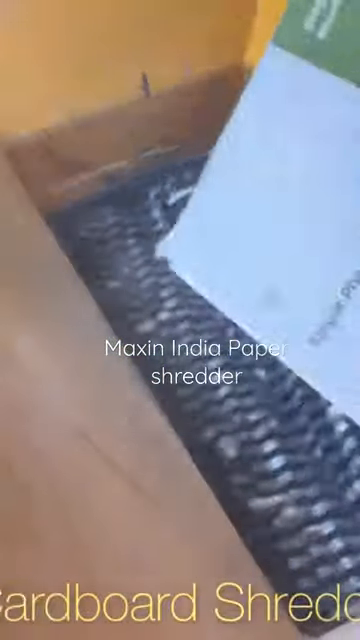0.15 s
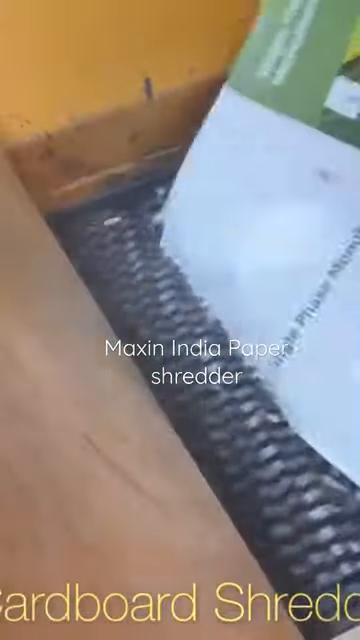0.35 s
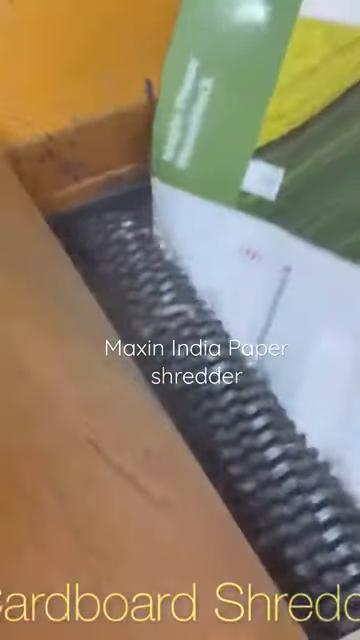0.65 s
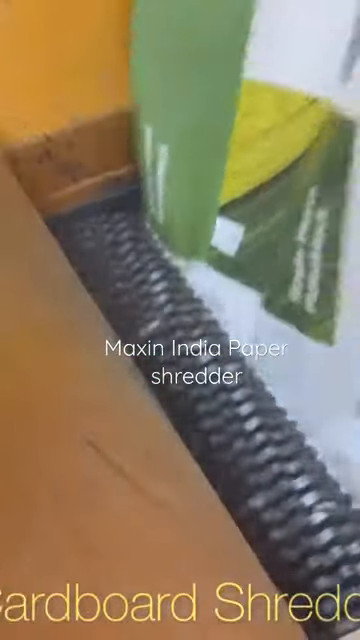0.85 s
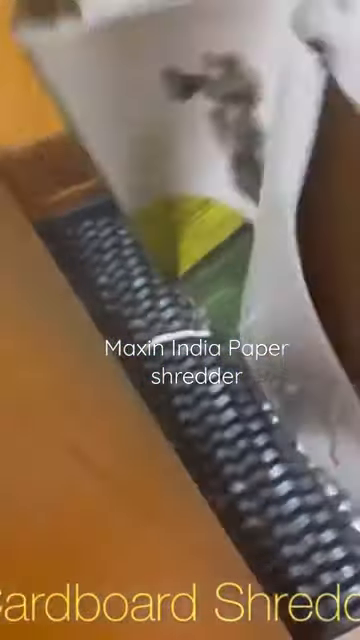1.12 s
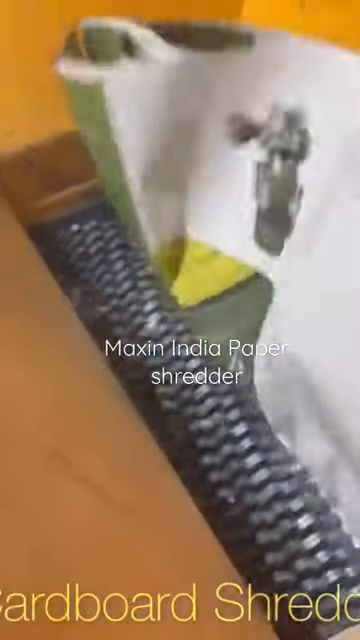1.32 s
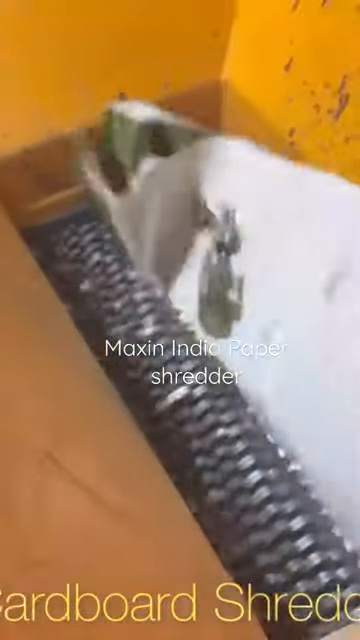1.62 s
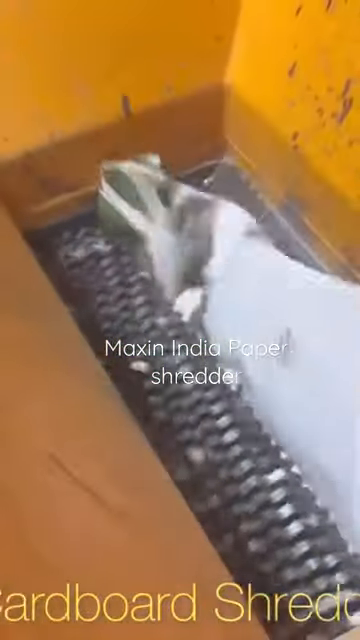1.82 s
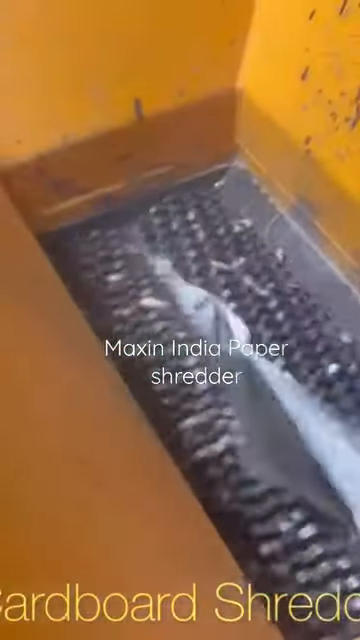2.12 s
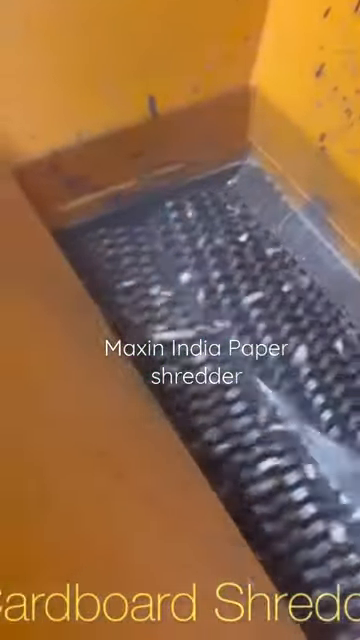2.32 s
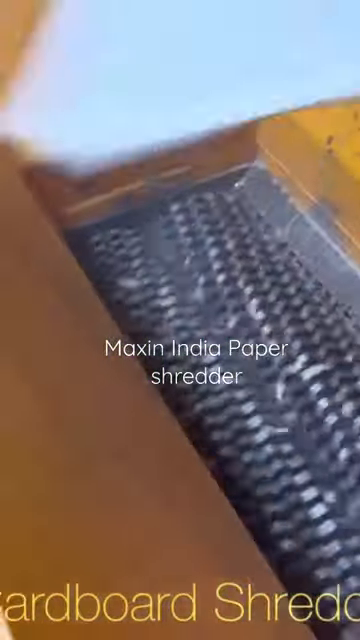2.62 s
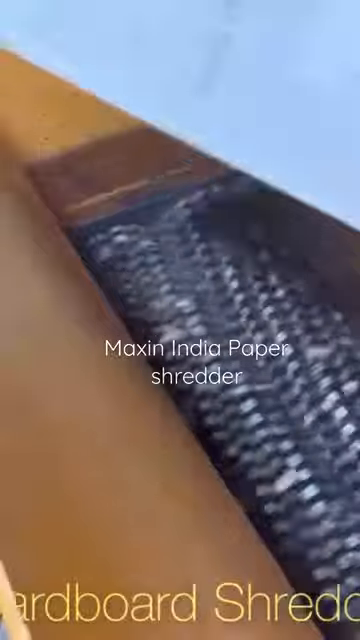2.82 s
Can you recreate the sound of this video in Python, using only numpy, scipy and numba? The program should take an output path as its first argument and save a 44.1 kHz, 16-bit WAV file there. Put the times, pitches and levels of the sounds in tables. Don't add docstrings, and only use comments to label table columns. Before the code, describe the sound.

Close by a metal hopper, shredder rollers bite into cardboard, crackling and tearing hard over low pulsing hum and thin motor whine; the crunch dies away, leaving rumble, a small knock and a thin squeak.

```python
import sys
import numpy as np
from scipy import signal
from scipy.fft import rfft, irfft
from scipy.io import wavfile
from scipy.ndimage import uniform_filter1d
from numba import njit

SR = 44100
rng = np.random.default_rng(int(sys.argv[2]) if len(sys.argv) > 2 else 0)


def invert_db(level):
    return 10 ** (np.asarray(level, dtype=float) / 20)


def bounce(signal):
    frames = np.transpose(np.atleast_2d(signal))
    limited = np.clip(frames, -1, 1)
    pcm = np.round(limited * 32767).astype(np.int16)
    wavfile.write(sys.argv[1], SR, pcm)


N = 130095

# frequency in Hz, density in dB per Hz.
IDLE_SPECTRUM = [(140, 1), (450, -1), (650, -10), (1500, -20.5), (3200, -29.5), (5200, -25), (8000, -33),
                 (15000, -60.5)]
# frequency in Hz, density in dB per Hz.
SUB_SPECTRUM = [(20, -20), (50, -22), (85, 12)]
WHINE_HZ = [3871, 4236, 4700, 4820, 4941, 5060, 5180, 5301, 5768, 5889, 6122, 1098]
# level at the start in dB, level at the end in dB.
WHINE_LEVELS = [(-68, -57), (-66, -63), (-68, -65), (-52, -72), (-57, -54), (-63, -56), (-63, -52),
                (-67, -61), (-65, -60), (-72, -62), (-68, -60), (-52.5, -58)]
# time in seconds, pitch in Hz, level in dB.
SQUEAK_PATH = [
    (2.675, 8730, -66),
    (2.69, 9120, -57),
    (2.744, 9760, -63),
    (2.764, 10360, -58),
    (2.784, 10060, -61),
    (2.81, 9750, -77),
    (2.84, 8940, -50.5),
    (2.86, 9300, -65),
    (2.95, 9400, -60),
]
# start in seconds, peak in dB, pitch in Hz, dip before it in dB.
THROBS = [(0.0, -20, 97.6, -19), (0.085, -27.5, 98.5, -32), (0.202, -9, 102.4, -33),
          (0.352, -9.5, 105.3, -6.5), (0.411, -6.5, 106.1, -15.5), (0.501, -6, 100.7, -21),
          (0.643, 0, 102.6, -23), (0.728, -5.5, 104.8, -29), (0.797, -1.5, 102.3, -28),
          (0.881, -8.5, 94.6, -6), (0.941, -5.5, 104.5, -32), (0.995, -10, 100.1, -22),
          (1.048, -7, 100.7, -18), (1.133, -8, 99.7, -28), (1.218, -7.5, 99.6, -20),
          (1.298, -11.5, 98.2, -14), (1.384, -7.5, 109.7, -25.5), (1.49, -6, 106.3, -4),
          (1.58, -9, 100.9, -37), (1.692, -8.5, 105.1, -15), (1.753, -5, 107.5, -33),
          (1.821, -9, 100.7, -18.5), (1.892, -1, 103.4, -25), (1.977, -11.5, 103.2, -11),
          (2.042, -6.0, 103.5, -14.5), (2.115, -4, 108.2, -8.5), (2.197, -14, 107.6, -24),
          (2.328, -14, 108, -34), (2.388, -9.5, 106.7, -16.5), (2.463, -27, 106.9, -33),
          (2.539, -16.5, 108.4, -41), (2.609, -14.5, 108.4, -25), (2.724, -25.5, 101.3, -26),
          (2.822, -20.5, 102.4, -45), (2.914, -30, 99, -17)]
# time in seconds, peak in dB, ring in Hz, crack relative to the peak in dB.
SNAPS = [(0.222, -18, 1185, -3.5), (0.3, -16, 1430, -8.5), (0.312, -12.5, 1070, -7.5),
         (0.319, -17, 924, 0.5), (0.415, -8.5, 1100, -8), (0.44, -10.5, 890, -4.5),
         (0.455, -7, 1200, -12.5), (0.542, -7.5, 1070, -12), (0.608, -7.5, 1240, -26),
         (0.634, -2, 1535, -13.5), (0.657, -14, 2270, -4.5), (0.707, -8, 2100, -28), (0.716, -22, 950, 3.5),
         (0.792, -4, 1870, -36), (0.865, -9.5, 1650, -32), (0.966, -4, 2190, -22), (1.023, -1, 1500, -21.5),
         (1.09, -2.5, 1290, -22), (1.125, -6, 1240, -14.5), (1.244, -1, 1670, -35),
         (1.309, -9.5, 1260, -9.5), (1.345, -3.5, 1396, -25.5), (1.418, -5.5, 1180, -24),
         (1.561, -10.5, 1226, -26), (1.694, -12.5, 1730, 0.5), (1.713, -12.5, 850, -6),
         (1.824, -17, 1180, -6), (1.967, -18, 1080, -20), (2.386, -37, 1070, 10), (2.581, -14.5, 1165, -30)]
# time in seconds, peak in dB, ring in Hz.
FURTHER_SNAPS = [(0.35, -24.5, 1025), (0.383, -26.5, 930), (0.503, -19, 700), (0.51, -16, 1290),
                 (0.569, -11, 1050), (0.586, -12, 970), (0.671, -6, 1510), (0.722, -11.5, 700),
                 (0.755, -10, 1530), (0.78, -3.5, 1080), (0.834, -6.5, 1860), (0.876, -15, 940),
                 (0.917, -9, 1890), (0.937, -11, 1610), (1.01, -8.5, 700), (1.059, -8, 880), (1.154, -6, 1270),
                 (1.166, -10, 2020), (1.188, -9.5, 1410), (1.257, -6.5, 2290), (1.291, -20, 910),
                 (1.327, -21, 750), (1.368, -20, 1030), (1.387, -13.5, 940), (1.449, -11, 1070),
                 (1.491, -7, 1380), (1.512, -16.5, 730), (1.531, -15, 778), (1.615, -11, 1250),
                 (1.634, -10, 1790), (1.659, -22, 1010), (1.74, -16.5, 1255), (1.786, -8.5, 1130),
                 (1.88, -13.5, 1160), (1.9, -9.5, 1545), (1.931, -13, 680), (2.012, -22, 1550),
                 (2.038, -13, 1320), (2.086, -11, 1226), (2.149, -18, 1330), (2.188, -18, 970),
                 (2.562, -22.5, 484), (2.574, -18, 735), (2.585, -22.5, 436), (2.575, -23.5, 272),
                 (2.59, -21, 247), (2.205, -22.5, 516), (1.828, -27.5, 465), (0.545, -10.5, 613),
                 (2.6, -21.5, 872.4), (2.62, -31, 1100), (2.94, -19, 463)]
# time in seconds, crunch level in dB, treble emphasis in dB.
LOAD = [(0, -43, -2.5), (.2, -36, 6), (.3, -28.5, -1.5), (.5, -26, 1.5), (.68, -24, -1), (.92, -18.5, -3),
        (1.36, -23.5, 0.5), (1.5, -20, 1), (1.6, -25.5, 3), (2.1, -26.5, 7), (2.18, -30.5, 5.5),
        (2.26, -37, 10), (2.34, -43.5, 14.5), (2.54, -37.5, -12), (2.58, -38.5, -24), (2.635, -36, -4),
        (2.9, -43.5, 4), (2.95, -39.5, -12)]
# frequency in Hz, density in dB per Hz.
CRUNCH_SPECTRUM = [(140, 5), (260, -3.5), (380, 3), (560, -4.5), (1100, -5), (2300, -12), (4000, -20.5),
                   (10000, -33.5)]
# frequency in Hz, side-to-mid level in dB, likeness 0-1, phase in rad.
PORTS = [(110, -38, .4, 1), (358, -9, 0.8, -1.3), (700, -1, 0.7, -2), (1200, -4, 0.86, -3),
         (1860, -15, 0.57, -21.5), (2900, -4.5, 0.16, -1.7), (6600, -3.5, .4, -1.76),
         (11000, 3.5, 0.5, -1.5)]


def read(table, x, col, log=False):
    a = np.array(table, float)
    if log:
        return np.interp(np.log(x + 1), np.log(a[:, 0] + 1), a[:, col])
    return np.interp(x, a[:, 0], a[:, col])


def level(x, db):
    return x * invert_db(db) / np.sqrt(np.mean(x ** 2))


def shaped(x, gain):
    return irfft(rfft(x) * gain(np.arange(N // 2 + 1) * SR / N), N)


def high_pass(x, corner_hz):
    return shaped(x, lambda f: f ** 2 / (f ** 2 + corner_hz ** 2))


def bell(x, hz, octaves):
    return shaped(x, lambda f: np.exp(-(np.log2((f + 1) / hz) / octaves) ** 2))


def noise():
    return rng.standard_normal((2, N))


def walk(rate):
    k = int(SR / rate)
    held = np.repeat(rng.standard_normal(N // k + 1), k)
    return 0.88 * uniform_filter1d(uniform_filter1d(held, k), k)[:N]


@njit
def rings(start, hz, cycles, size, rise, n):
    out = np.zeros(n)
    for k in range(len(start)):
        w = 2 * np.pi * hz[k] / SR
        turn = np.exp(1j * w - hz[k] / SR / cycles[k])
        z = size[k] + 0j
        fade = np.exp(-hz[k] / SR / rise)
        soft = 1.
        for i in range(start[k], min(n, start[k] + int(5 * cycles[k] * SR / hz[k]))):
            out[i] += z.imag * (1 - soft)
            soft *= fade
            z *= turn
    return out


def twin_rings(start_s, hz, cycles, size, rise):
    late, detune = rng.random((len(start_s), 2)).T
    spread_s = 0.0042
    direct_at = (start_s * SR).astype(np.int64)
    scattered_at = ((start_s + spread_s * late) * SR).astype(np.int64)
    return np.array([rings(direct_at, hz, cycles, size, rise, N),
                     rings(scattered_at, hz * (0.846 + .2 * detune), cycles, size, rise, N)])


def idle():
    rumble = 0
    for hz in 140 * 2 ** np.arange(0, 7.5, .5):
        band = bell(noise(), hz, 0.39)
        rumble = rumble + band * invert_db(read(IDLE_SPECTRUM, hz, 1, True) + 4.0 * walk(10.1))
    sub = shaped(noise(), lambda f: invert_db(read(SUB_SPECTRUM, f, 1, True)) / (1 + (f / 85) ** 8))
    return level(rumble, -32.5) + level(sub, -33.5)


def whine(t):
    out = 0
    for hz, (first_db, last_db) in zip(WHINE_HZ, WHINE_LEVELS):
        db = 3.8 + first_db + (last_db - first_db) * t / t[-1] + 1.6 * walk(11)
        out = out + invert_db(db) * np.sin(2 * np.pi * hz * t + 0.55 * walk(18))
    return out


def squeak(t):
    hz = read(SQUEAK_PATH, t, 1) * (1 + 0.0052 * walk(100))
    onset = np.clip((t - SQUEAK_PATH[0][0]) / 0.009, 0, 1)
    db = 8.5 + read(SQUEAK_PATH, t, 2) + 2.46 * walk(80)
    return onset * invert_db(db) * np.sin(2 * np.pi * np.cumsum(hz) / SR)


def boom(t):
    start, peak_db, pitch_hz, dip_db = np.array(THROBS).T
    edges = np.append(start, N / SR)
    mids = (edges[1:] + edges[:-1]) / 2
    place = np.interp(t, edges, np.arange(len(edges)))
    arch = np.abs(np.sin(np.pi * place))
    crest = invert_db(np.interp(t, mids, peak_db)) * arch
    dip = invert_db(np.interp(t, start, dip_db)) * (1 - arch)
    turns = np.cumsum(peak_db - dip_db > 9) % 2
    flip = np.pi * uniform_filter1d(1. * turns[place.astype(int)], size=600)
    phase = 2 * np.pi * np.cumsum(np.interp(t, mids, pitch_hz)) / SR
    return np.hypot(crest, dip) * np.sin(phase + flip)


def snaps():
    shared_crack_db = -20.5
    start, peak_db, hz, crack_db = np.array(SNAPS + [c + (shared_crack_db,) for c in FURTHER_SNAPS]).T
    at = (start * SR).astype(np.int64)
    count = len(start)
    ring = 0
    for ratio, db in ((1.015, 0), (1.49, -4.0), (0.618, -6.5), (0.2338, -11.5)):
        ring = ring + twin_rings(start, hz * ratio, np.full(count, 2.065), invert_db(peak_db + 2.5 + db), 1.0)
    hits = np.zeros(N)
    hits[at] = invert_db(peak_db + crack_db + 2.5)
    crack_s, crack_hz = 0.0026, 4130
    env = signal.lfilter([1], [1, -np.exp(-1 / (crack_s * SR))], hits)
    crack = bell(env * noise(), crack_hz, 0.95)
    tick_size = invert_db(peak_db + 2.2 * crack_db - 2)
    tick = rings(at, np.full(count, 10600.), np.full(count, 1.7), tick_size, 0.35, N)
    return ring + tick + crack


def bursts():
    start = np.array([c[0] for c in SNAPS + FURTHER_SNAPS])
    hits = np.zeros(N)
    hits[(start * SR).astype(np.int64)] = 1
    decay_s = 0.011
    return np.minimum(signal.lfilter([1], [1, -np.exp(-1 / (decay_s * SR))], hits), 1)


def crunch(t, count=2200, size=3):
    when, strength = np.repeat(rng.random((count, 2)), size, axis=0).T
    pitch, length, delay = rng.random((count * size, 3)).T
    hz = 150 * 110 ** pitch
    scatter_db = np.minimum(-9 * np.log(1 - strength), 7.5)
    peak = invert_db(scatter_db) * hz / 1000
    grains = twin_rings(when * N / SR + .0015 * delay, hz, 2.25 * (0.31 + length), peak, 0.26)
    tear = noise() * invert_db(5.1 * walk(90))
    flare_db = 5 * (bursts() - 0.4049) + 1.2 * walk(29.76) + 0.33 * walk(8.3)
    raw = (level(grains, 0) + level(tear, -1.5)) * invert_db(flare_db)
    raw = raw + invert_db(6.5) * high_pass(noise(), 4200)
    spectrum = lambda f: invert_db(read(CRUNCH_SPECTRUM, f, 1, True)) * (f / 130) ** 4 / (1 + (f / 130) ** 4)
    full = shaped(raw, spectrum)
    crisp = high_pass(full, 2850)
    band = shaped(full, lambda f: (f > 500) * (f < 2800))
    mix = full - crisp + crisp * invert_db(read(LOAD, t, 2))
    return mix / np.std(band) * invert_db(read(LOAD, t, 1) - 1.5)


def tail(x, t60):
    h = rng.standard_normal((2, SR // 2)) * invert_db(-60 * np.arange(SR // 2) / SR / t60)
    return signal.fftconvolve(x, h / np.sqrt(np.sum(h[0] ** 2)), axes=1)[:, :N]


def scene():
    t = np.arange(N) / SR
    work = crunch(t) + snaps()
    hopper = invert_db(-11.5) * tail(work, 0.16)
    mid, diffuse = work + hopper + idle() + whine(t) + squeak(t)
    like = lambda f: np.clip(read(PORTS, f, 2, True), 0, 1)
    gain = lambda f: invert_db(read(PORTS, f, 1, True))
    side = shaped(mid, lambda f: gain(f) * like(f) * np.exp(1j * read(PORTS, f, 3, True)))
    side = side + shaped(diffuse, lambda f: gain(f) * np.sqrt(1 - like(f) ** 2))
    mid = mid + boom(t)
    return np.array([mid + side, mid - side])


def gap(x, size=1024):
    mid, side = (x[0] + x[1]) / 2, (x[0] - x[1]) / 2
    f, t, z = signal.stft(mid, SR, nperseg=size)
    f = f[:, None]
    jump = np.repeat(rng.standard_normal((len(t), 2)), 3, axis=0)[:len(t)].T
    low_hz = 9900 + 330 * jump[0]
    high_hz = 14850 + 600 * jump[1]
    usual = uniform_filter1d(uniform_filter1d(np.abs(z), size=50, axis=0), size=24, axis=1)
    strong = uniform_filter1d(np.abs(z), size=9, axis=0) > invert_db(7.5) * usual
    all_pass = (t > 0.638) & (t < 0.655)
    kept = (f < low_hz) | (f > high_hz) | (strong & (f < 14800)) | all_pass
    mid = signal.istft(z * kept, SR, nperseg=size)[1][:N]
    return np.array([mid + side, mid - side])


def roll_off(x):
    return signal.sosfilt(signal.butter(12, 17080, fs=SR, output="sos"), x)


def record(dry):
    rounded = np.tanh(0.99 * dry) / 0.97
    mix = shaped(gap(rounded), lambda f: f < 15950)
    return roll_off(mix)


dry = scene()
out = record(dry)
bounce(out)
```